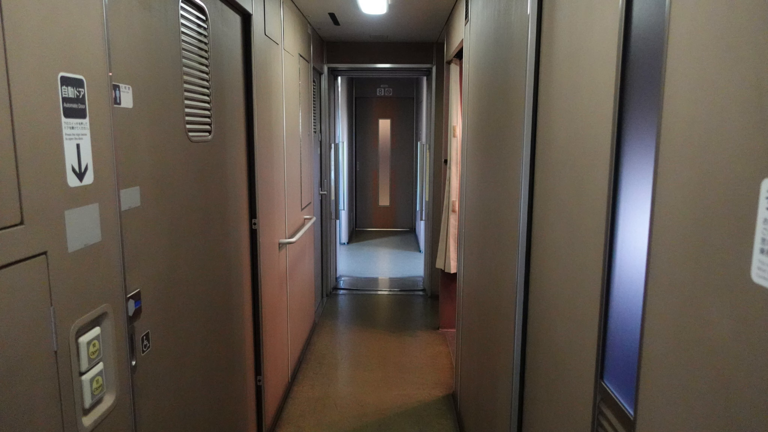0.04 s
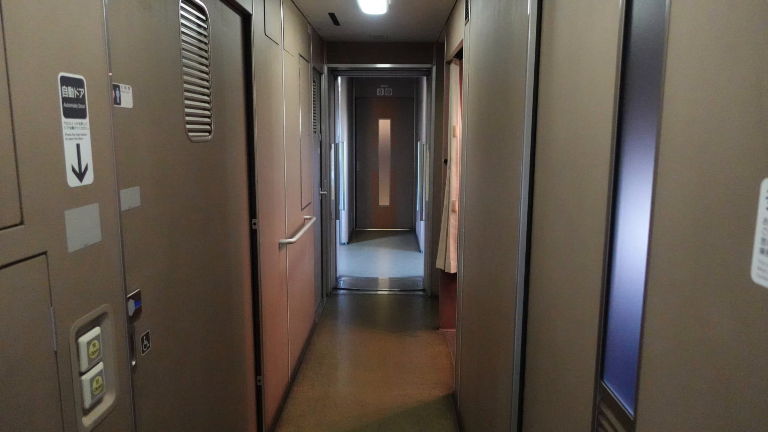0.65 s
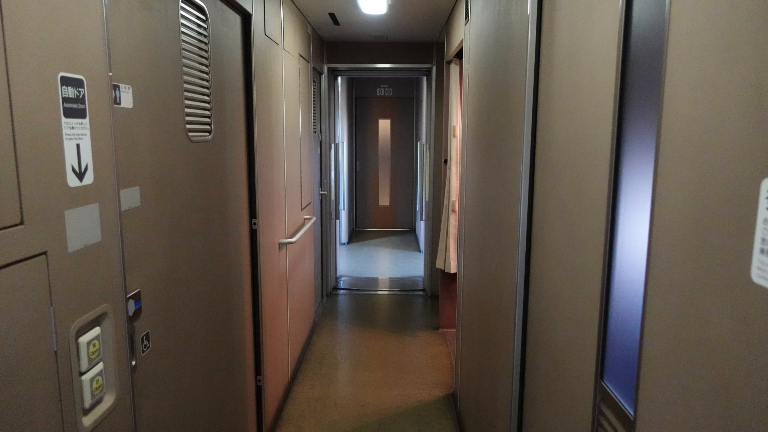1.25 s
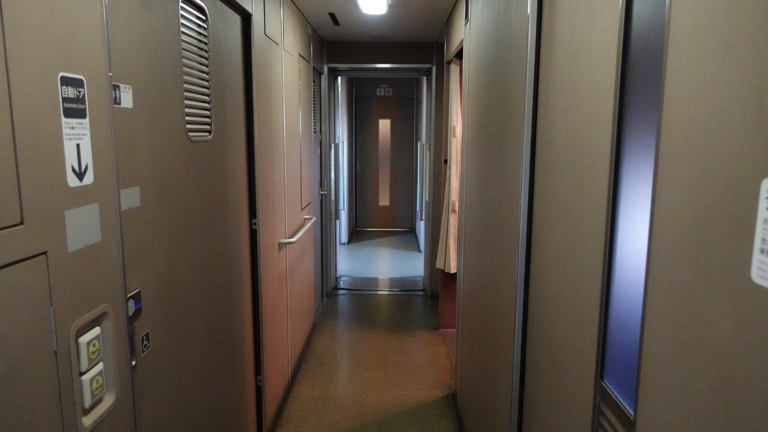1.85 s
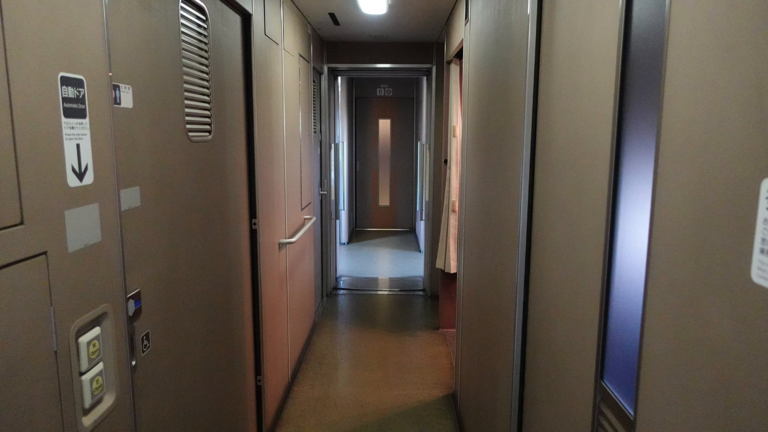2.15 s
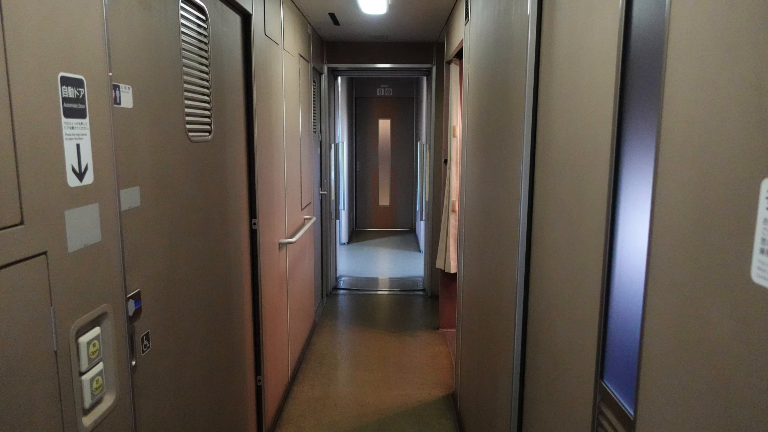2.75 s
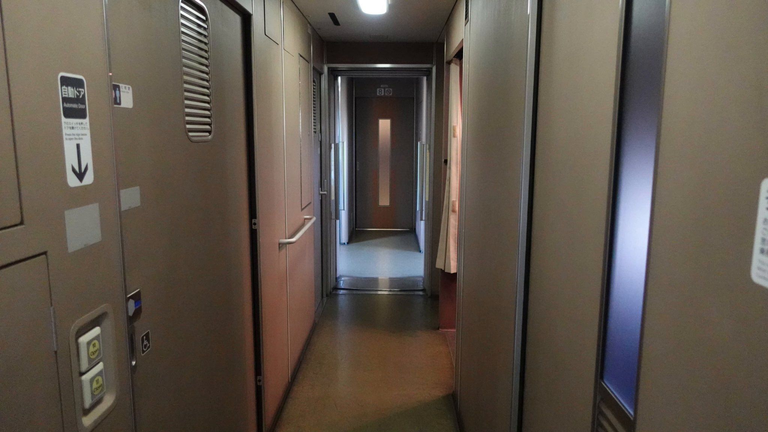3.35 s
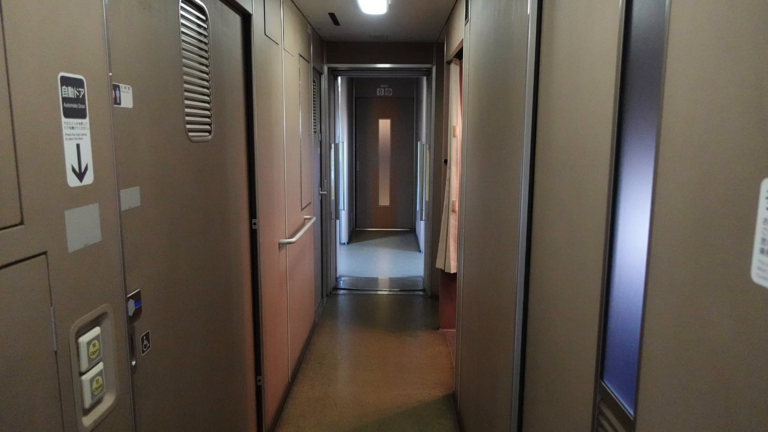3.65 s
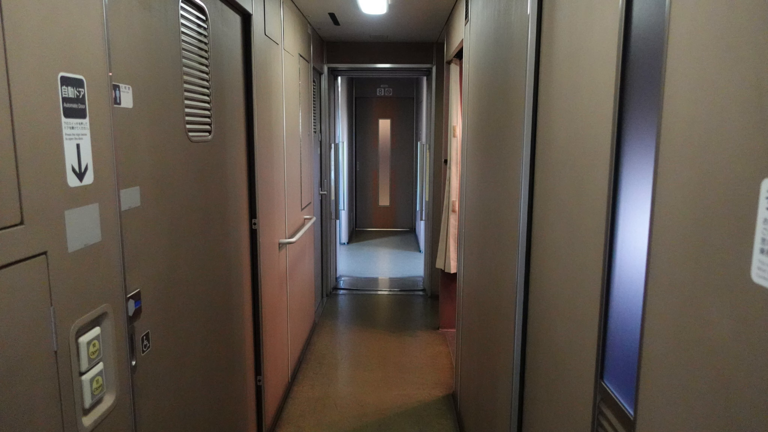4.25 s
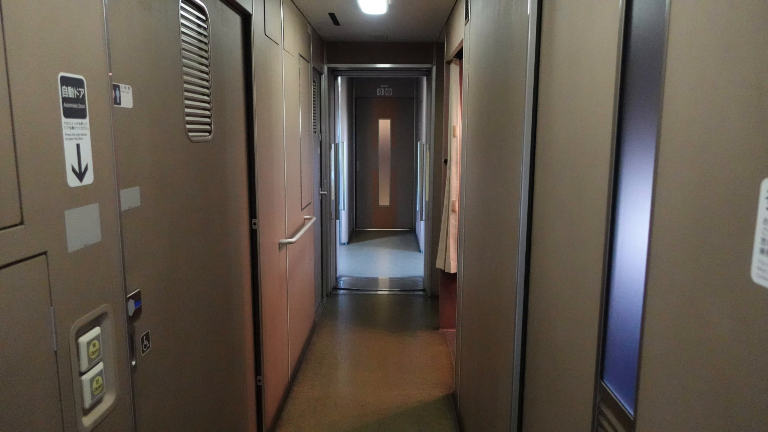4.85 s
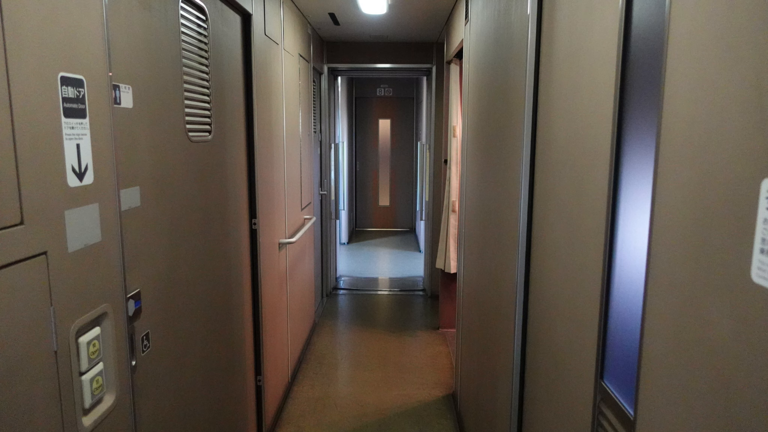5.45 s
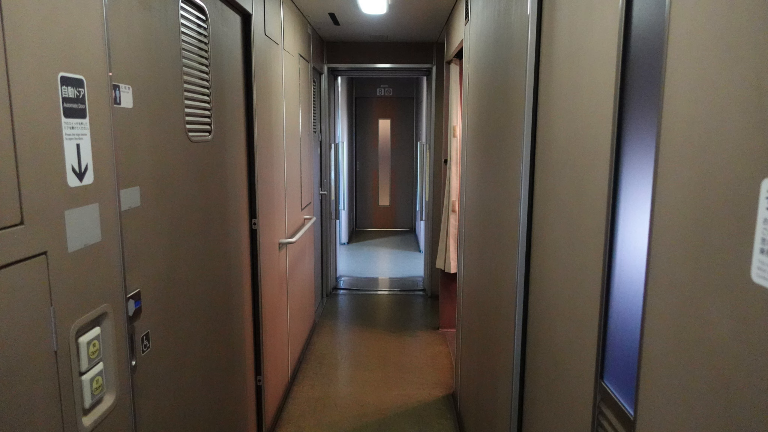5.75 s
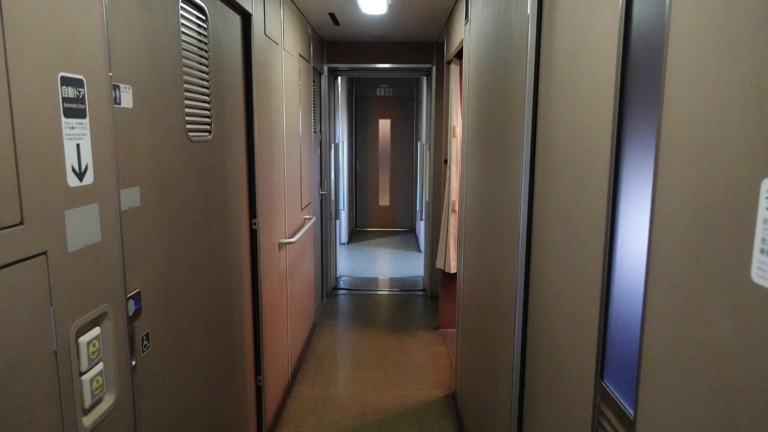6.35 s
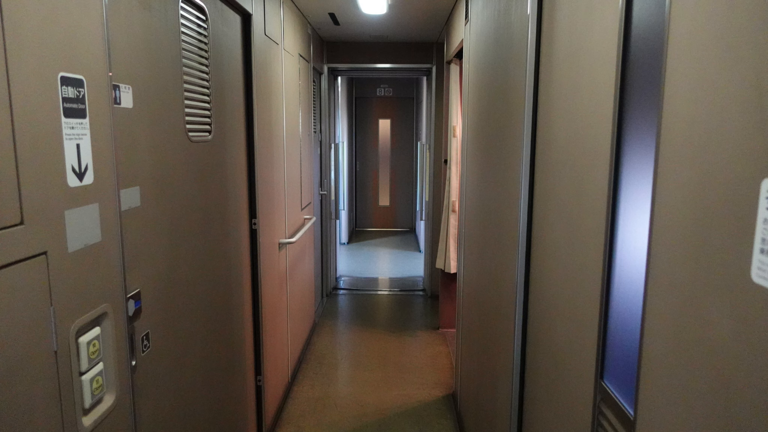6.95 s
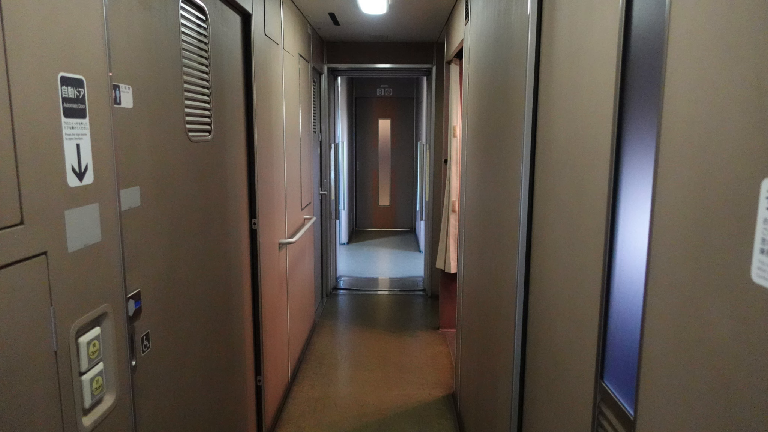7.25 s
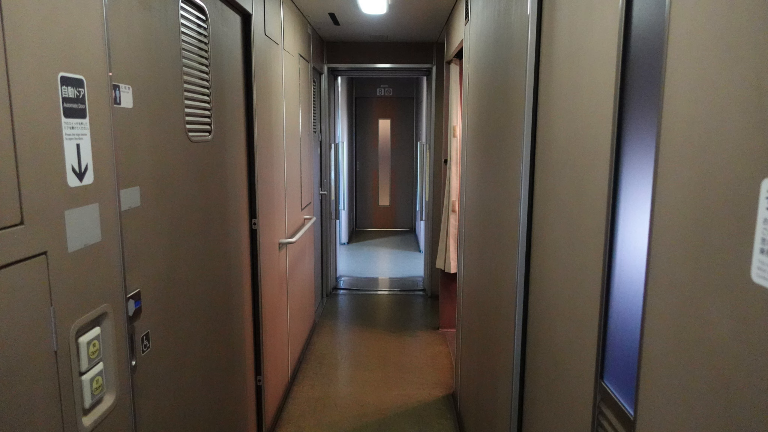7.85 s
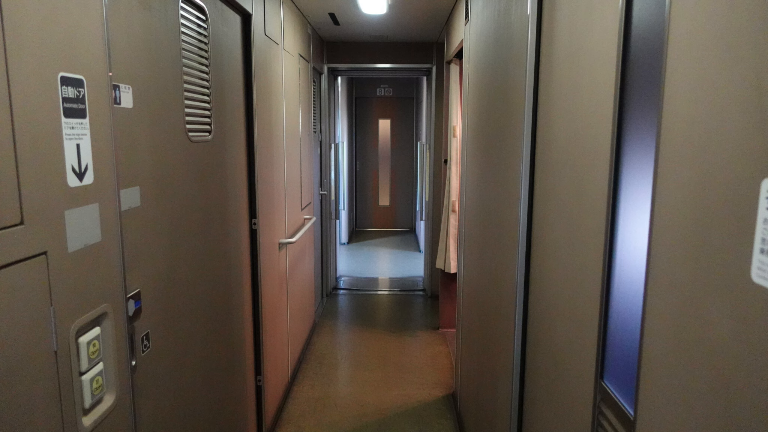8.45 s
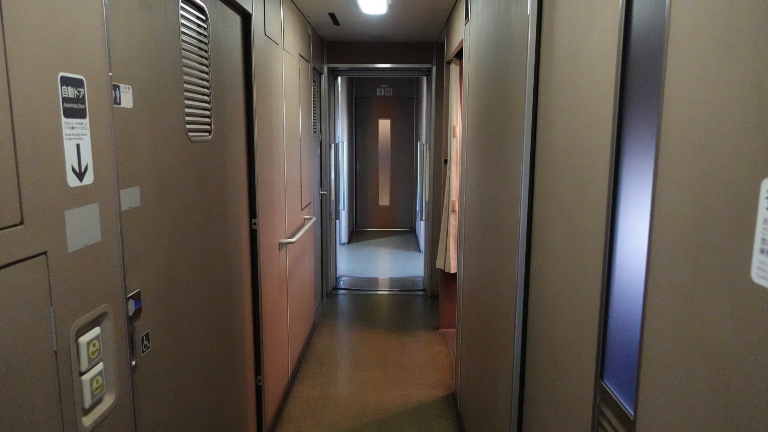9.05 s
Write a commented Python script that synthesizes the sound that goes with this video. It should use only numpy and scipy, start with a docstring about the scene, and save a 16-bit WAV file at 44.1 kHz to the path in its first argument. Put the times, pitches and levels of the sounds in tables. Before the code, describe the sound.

Deep rumble and rushing air inside a high-speed train, swelling suddenly halfway through, with a faint whine and light ticks.

```python
"""High-speed train, between two cars

A stereo pair stands in the vestibule at full speed. The track shakes the body into a rumble and the
floor panels into a drone, out-of-round wheels throb, and air booms, rushes and hisses along the skin.
Halfway all of this swells, as on entering a tunnel. Beneath it the drive whines, a loose fitting ticks,
the wall trim rustles and some electronics close to the microphones buzz for a moment."""
import sys
import numpy as np
from scipy import signal
from scipy.fft import rfft, irfft
from scipy.io import wavfile
from scipy.ndimage import uniform_filter1d

SR = 44100
rng = np.random.default_rng(int(sys.argv[2]) if len(sys.argv) > 2 else 0)


def digitize_waveform(pressure):
    """Quantize a signal to 16-bit integers and store it at the path in sys.argv[1].

    Rows of a 2-D input are taken as channels; values are limited to [-1, 1].
    """
    field = np.atleast_2d(pressure).T
    bounded = np.clip(field, -1, 1)
    quanta = np.round(bounded * 32767).astype(np.int16)
    wavfile.write(sys.argv[1], SR, quanta)


N = 401751
TIME, HZ = np.arange(N) / SR, np.fft.rfftfreq(N, 1 / SR)

# rumble of the car body, all around the microphones: (frequency [Hz], relative density [dB])
BODY_SPECTRUM = [(5, -27.5), (12, -21.5), (22, -14.5), (30, -3), (41, -6), (52, -1.5), (64, -0.5),
                 (75, -3.5), (90, -1.5), (101, -13.5), (150, -39), (400, -91)]
# drone of the panels underfoot: (frequency [Hz], relative density [dB])
PANEL_SPECTRUM = [(50, -36.5), (85, -12), (102, -3), (118, 3), (132, -4.5), (155, -9.5), (190, -26.5),
                  (350, -61), (1500, -110)]
# bumps in the track: (time [s], length [s], body lift [dB], panel lift [dB])
TRACK_BUMPS = [(0.52, 0.44, 3.5, -0.5), (3.21, .2, 2.5, 3), (3.78, 0.19, 0, 6.5), (4.07, 0.14, 6, 3),
               (4.81, 0.18, -6.5, 9), (5.16, .16, -0.5, 5.5), (5.49, 0.11, -1, 7.5), (5.95, 0.07, 6, 2),
               (6.52, .28, 5, 1.5), (7.24, 0.2, -1.5, 6), (8.29, 0.14, 1.5, 3)]
def body_and_floor():
    """The track shakes the heavy car body and the lighter floor panels; each bump shifts their levels."""
    body_lift_db, panel_lift_db = swells(TRACK_BUMPS)
    body_db = tunnel_level(open_db=-21.5, lift_db=5.7, rise_s=.09) + body_lift_db
    panel_db = tunnel_level(open_db=-26, lift_db=5.74, rise_s=.053) + panel_lift_db
    rumble = gain_of(body_db) * steadied(vestibule_noise(BODY_SPECTRUM), .25)
    drone = gain_of(panel_db) * steadied(vestibule_noise(PANEL_SPECTRUM), .5)
    return rumble + drone


# out-of-round wheels below the floor: (multiple of the turning rate, relative level [dB])
WHEEL_ORDERS = [(1, -33.5), (2, -37), (3, -35.5), (4, -32)]
def wheels(turning_hz=28.98, wander=.012, waver_db=2):
    """Each turn of the wheels thumps the floor: a few low, wavering harmonics."""
    turns = np.cumsum(turning_hz * (1 + wander * drift(2.16))) / SR
    throb = sum(gain_of(db + waver_db * drift(1.9)) * np.sin(2 * np.pi * (order * turns + rng.random()))
                for order, db in WHEEL_ORDERS)
    return gain_of(tunnel_level(open_db=-4, lift_db=5, rise_s=.1)) * throb


# air in the gap between the cars, just outside: (frequency [Hz], relative density [dB])
GAP_SPECTRUM = [(90, -28.5), (135, -5.5), (165, 2), (195, -1.5), (218, -4), (262, -5), (310, -14),
                (360, -21.5), (500, -41.5), (1500, -89)]
# air along the skin, heard through the wall: (frequency [Hz], relative density [dB])
SKIN_SPECTRUM = [(180, -30.5), (330, -2.5), (400, -4.5), (470, -3.5), (560, -1), (690, -3.5), (820, -7.5),
                 (1060, -8.5), (1300, -14), (1550, -17), (1850, -21.5), (2400, -25), (3400, -37.5),
                 (8000, -73)]
# air at the door seals: (frequency [Hz], relative density [dB])
SEAL_SPECTRUM = [(900, -22.5), (2000, -0.5), (2800, 2.5), (3400, -0.5), (4150, -2), (4800, -4), (5800, -7),
                 (6600, -10.5), (8300, -16), (10000, -15.5), (12500, -21), (15500, -27.5)]
# gusts at the doors: (time [s], length [s], rush lift [dB], hiss lift [dB])
DOOR_GUSTS = [(0.83, .4, 1, 1.5), (4.03, .16, 1.5, 4), (6.81, .2, 1.8, 1.5), (7.81, 0.17, 1, 1.5),
              (8.84, 0.18, 0, 1)]
def air(flutter_db=.64):
    """The boundary layer booms in the gap between the cars, rushes on the skin and hisses at the seals."""
    rush_lift_db, hiss_lift_db = swells(DOOR_GUSTS)
    eddies_db = flutter_db * drift(24)
    boom_db = tunnel_level(open_db=-32.5, lift_db=7.82, rise_s=.15)
    rush_db = tunnel_level(open_db=-42.5, lift_db=6.95, rise_s=.14) + rush_lift_db + eddies_db
    hiss_db = tunnel_level(open_db=-63, lift_db=3.8, rise_s=.2) + hiss_lift_db + eddies_db
    boom = gain_of(boom_db) * steadied(vestibule_noise(GAP_SPECTRUM), .24)
    rush = gain_of(rush_db) * steadied(vestibule_noise(SKIN_SPECTRUM), .36)
    hiss = gain_of(hiss_db) * vestibule_noise(SEAL_SPECTRUM)
    return boom + rush + hiss


# slow course of the gear whine as it reaches the vestibule: (time [s], level [dB])
WHINE_COURSE = [(0, -65.5), (0.9, -59.5), (1.3, -62.5), (2.05, -62), (2.42, -64.5), (2.8, -60.5),
                (3.9, -66), (5.6, -65.5), (7.0, -64), (8.1, -70)]
# brief flares of the whine: (time [s], length [s], lift [dB])
WHINE_FLARES = [(3.16, .18, 5.5), (4.55, .22, 11), (6.72, 0.098, 8), (6.87, .09, 7), (7.48, .2, 9)]
def gear_whine(pitch_hz=2519, waver_db=1.4, blur_hz=30, steady=1.7, apart=.93):
    """The gear tone reaches each microphone by many shifting paths, so it flutters."""
    whine_db = np.interp(TIME, *np.transpose(WHINE_COURSE)) + swells(WHINE_FLARES)[0]
    whine_db += waver_db * drift(6)
    shared, left, right = (drift(blur_hz) + 1j * drift(blur_hz) for _ in range(3))
    paths = steady + shared + apart * np.array([left, right])
    tone = np.exp(2j * np.pi * np.cumsum(pitch_hz + 5 * drift(6)) / SR)
    return gain_of(whine_db) * steadied((paths * tone).real, .15)


# modes of a loose fitting in the vestibule: (frequency [Hz], relative level [dB], t60 [s])
FITTING_MODES = [(5100, -12.5, .008), (6310, -14, .008), (7750, 0, 0.0049), (8520, 0, 0.0074),
                 (9500, -7.5, .008), (10900, -13.5, .009), (11800, -15.5, .009), (12900, -18, .01)]
def tick(rise_s=.00089, walls_db=-4.5, walls_t60=.028, tail_db=-10.5, tail_t60=.2,
         scrape_db=-4, scrape_t60=.024):
    """One tick, mono peak 1: a short ring and scrape, quick echoes off the near walls, a faint tail."""
    t = np.arange(SR // 8) / SR
    ring = np.zeros(len(t))
    for hz, db, t60 in FITTING_MODES:
        decay = gain_of(db + 2 * rng.standard_normal() - 60 * t / t60)
        ring += decay * np.sin(2 * np.pi * (hz * rng.uniform(.93, 1.01) * t + rng.random()))
    ring *= 1 - np.exp(-(t / rise_s) ** 2)
    walls, tail, friction = rng.standard_normal((3, 2, len(t)))
    walls *= (t > .002) * gain_of(-60 * t / walls_t60)  # the first echo takes 2 ms
    tail *= gain_of(-60 * t / tail_t60)
    room = gain_of(walls_db) * walls / np.linalg.norm(walls[0])
    room += gain_of(tail_db) * tail / np.linalg.norm(tail[0])
    echoes = signal.fftconvolve(ring[None], room, axes=1)[:, :len(t)]
    scrape_band = signal.butter(2, [4000, 13000], "band", fs=SR, output="sos")
    scrape = signal.sosfilt(scrape_band, friction) * gain_of(-60 * t / scrape_t60)
    sound = evened(ring + echoes) + gain_of(scrape_db) * evened(scrape)
    return sound / abs(sound.mean(0)).max()


# the clearer ticks of the fitting: (time [s], relative peak level [dB])
FITTING_TICKS = [(0.3217, -55), (0.7278, -46), (0.7717, -47), (2.1047, -47.5), (2.4649, -48),
                 (3.6142, -45.5), (3.7953, -46), (4.2628, -50), (4.5965, -54), (4.6264, -50), (4.6658, -46),
                 (4.7357, -51), (4.7576, -50.5), (5.4236, -56), (5.6581, -50.5), (5.7988, -52),
                 (5.8402, -48.5), (6.145, -42.5), (6.2493, -49), (7.546, -42), (7.683, -51), (7.8242, -54),
                 (7.8591, -54), (7.8875, -50.5), (8.8409, -56), (9.0299, -54)]
def loose_fitting(lift_db=.5, faint_count=20, spread_db=2):
    """A loose fitting ticks; faint ticks fall at random between the clear ones, louder in the tunnel."""
    out = np.zeros((2, N))
    for s, db in FITTING_TICKS:
        add(out, s, gain_of(db + lift_db) * tick())
    faint_db = tunnel_level(open_db=-65.5, lift_db=6, rise_s=.1)
    for when, size in rng.random((faint_count, 2)):
        add(out, when * N / SR, gain_of(faint_db[int(when * N)] + spread_db * size) * tick())
    return out


# snaps and rustles along the walls: (time [s], length [s], level [dB], centre [Hz], width [Hz])
TRIM_RUSTLES = [(0.585, 0.036, -72, 11900, 3500), (0.734, 0.39, -73, 11000, 3000),
                (1.5, .025, -72, 13000, 2500), (1.545, .04, -72, 12500, 3000),
                (1.765, .3, -87, 14500, 1800), (4.805, 0.013, -52.5, 6500, 5540),
                (6.12, 0.22, -70.5, 11500, 3500), (6.413, .4, -73, 11000, 3970),
                (7.646, .016, -59, 12500, 1300)]
def wall_trim(apart=.7):
    """The trim rubs as the car flexes: bursts of high noise that start quickly and die away."""
    out = np.zeros((2, N))
    for s, length, db, centre_hz, width_hz in TRIM_RUSTLES:
        n = int(length * SR)
        shared, left, right = rng.standard_normal((3, n))
        friction = shared + apart * np.array([left, right])
        band = np.exp(-((np.fft.rfftfreq(n, 1 / SR) - centre_hz) / width_hz) ** 2 / 2)
        envelope = np.interp(np.arange(n) / n, [0, .15, 1], [0, 1, 0])
        add(out, s, gain_of(db) * envelope * evened(irfft(rfft(friction) * band, n)))
    return out


# harmonics of the electronic buzz: (multiple of the pitch, relative level [dB])
BUZZ_HARMONICS = [(3, 2), (4, -1), (6, -2), (7, -2), (8, -5.5), (10, -7), (11, -4.5), (12, -4.5), (13, -8),
                  (15, -7)]
# faint buzzes close by: (time [s], length [s], level [dB])
BUZZ_BURSTS = [(3.81, .2, -71), (3.945, .08, -77)]
def electronics_buzz(pitch_hz=1000, flicker_db=4, rasp_rad=1.1):
    """Some electronics near the microphones buzz for a moment, a little raspy."""
    bursts = sum(gain_of(db) * arch(s, length) for s, length, db in BUZZ_BURSTS)
    buzz = np.zeros(N)
    for multiple, db in BUZZ_HARMONICS:
        phase = 2 * np.pi * (multiple * pitch_hz * TIME + rng.random())
        buzz += gain_of(db) * np.sin(phase + rasp_rad * drift(250))
    return bursts * gain_of(flicker_db * drift(40)) * buzz


# motor cooling fans, heard from inside: (frequency [Hz], relative density [dB])
FAN_SPECTRUM = [(1500, -36), (1950, -14), (2130, -0.5), (2220, -5), (2310, -3.5), (2450, -15.5),
                (3000, -40.5)]
def cooling_fans(level_db=-67):
    """The motor fans blow a steady, breathy band of noise."""
    return gain_of(level_db) * vestibule_noise(FAN_SPECTRUM)


# tones of the power electronics, far in the background: (frequency [Hz], level [dB])
INVERTER_TONES = [(3144, -84.5), (10514, -90)]
def inverter(waver_db=2):
    """The inverter sings thin, wavering tones, in a different phase at each microphone."""
    out = np.zeros((2, N))
    for hz, db in INVERTER_TONES:
        phase = 2 * np.pi * (hz * TIME + rng.random((2, 1)) / 4) + drift(5)
        out += gain_of(db + waver_db * drift(5)) * np.sin(phase)
    return out


# narrow resonances of the walls around the microphones: (frequency [Hz], width [Hz], lift [dB])
WALL_RESONANCES = [(63.8, 7.7, 2.5), (565, 44, 2), (1130, 60, 0), (1570, 40, 2.5), (2080, 150, 3),
                   (2810, 32, 1), (3040, 26, 2.5), (3800, 40, 3), (4040, 27, 6), (4230, 35, 2.5),
                   (5300, 56, 3), (7880, 90, 5), (8500, 200, 2)]
# likeness of the left and right microphones: (frequency [Hz], correlation [-1..1])
PAIR_CORRELATION = [(30, .999), (90, 1), (180, 0.99), (280, 0.94), (370, 0.84), (560, 0.97), (720, 0.8),
                    (1050, .72), (1300, .37), (1520, .46), (1800, .1), (3000, -.05), (5600, -.12),
                    (8500, 0.07), (15000, -0.0041)]
def vestibule_noise(spectrum, right_lead_rad=.085, ripple_db=1.5):
    """Noise coloured by the walls; long waves reach both microphones alike, short ones differ."""
    mid, side = rfft(rng.standard_normal((2, N)))
    correlation = np.clip(over_frequency(PAIR_CORRELATION), -.9995, .9995)
    mid, side = mid * np.sqrt(1 + correlation), side * np.sqrt(1 - correlation)
    right_lead = np.exp(1j * right_lead_rad * HZ / (HZ + 120))
    pair = np.array([mid + side, (mid - side) * right_lead])
    walls_db = sum(db / (1 + (2 * (HZ - hz) / width) ** 2) for hz, width, db in WALL_RESONANCES)
    # countless small standing waves ripple the treble
    ripple = evened(uniform_filter1d(rng.standard_normal(len(HZ)), size=220)) * HZ / (HZ + 900)
    pair = irfft(pair * gain_of(over_frequency(spectrum) + walls_db + ripple_db * ripple), N)
    return pair / pair.mean(0).std()


def tunnel_level(open_db, lift_db, rise_s, entry_s=4.368, build_per_s=.036):
    """A layer's level in dB: the noise closes in quickly at the tunnel mouth, then builds slowly."""
    inside_s = np.maximum(TIME - entry_s, 0)
    return open_db + lift_db * (1 - np.exp(-inside_s / rise_s) + build_per_s * inside_s)


def arch(s, length):
    """A smooth rise to 1 and fall, centred on time s."""
    return np.cos(np.pi * np.clip((TIME - s) / length, -.5, .5)) ** 2


def swells(rows):
    """Each row moves the level in one arch; gives one dB curve for each lift column."""
    return sum(np.outer(lifts_db, arch(s, length)) for s, length, *lifts_db in rows)


def drift(rate_hz):
    """A random wander of rms 1, up to about this rate."""
    return evened(irfft(rfft(rng.standard_normal(N)) * np.exp(-(HZ / rate_hz) ** 2), N))


def steadied(pair, window_s):
    """Holds a stereo sound near rms 1, taking out its slow chance swells."""
    power = uniform_filter1d(pair.mean(0) ** 2, int(window_s * SR))
    return pair / np.sqrt(uniform_filter1d(power, SR // 20) + 1e-9)


def over_frequency(points):
    """Joins a table's points on a log frequency axis."""
    hz, value = np.transpose(points)
    return np.interp(np.log(HZ + 1), np.log(hz + 1), value)


def gain_of(db):
    """Decibels to a factor."""
    return 10 ** (np.asarray(db) / 20)


def evened(x):
    """Scales to rms 1."""
    return x / np.sqrt(np.mean(x ** 2) + 1e-20)


def add(mix, s, sound):
    """Mixes a stereo sound in at time s."""
    part = mix[:, round(s * SR):][:, :sound.shape[1]]
    part += sound[:, :part.shape[1]]


def scene():
    """Everything that reaches the pair in the vestibule."""
    ride = body_and_floor() + wheels() + air()
    return ride + gear_whine() + loose_fitting() + wall_trim() + electronics_buzz() + cooling_fans() + inverter()


def record(dry, balance_db=.15, cutoff_hz=15700):
    """The right microphone is slightly more sensitive; the top treble is cut off steeply."""
    sensitivity = gain_of([[-balance_db], [balance_db]])
    low_pass = signal.firwin(511, cutoff_hz, window=("kaiser", 9), fs=SR)
    return signal.oaconvolve(dry * sensitivity, low_pass[None], "same")


dry = scene()
out = record(dry)
digitize_waveform(out)
```